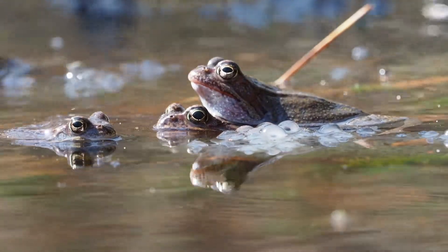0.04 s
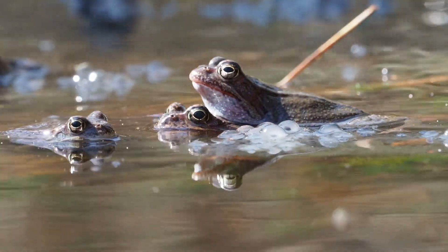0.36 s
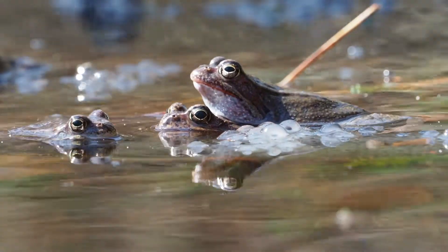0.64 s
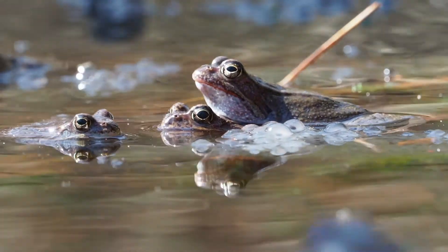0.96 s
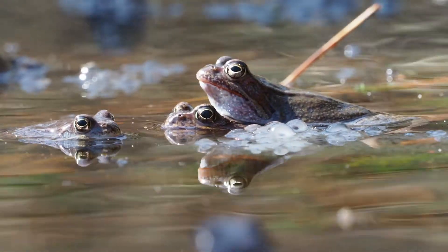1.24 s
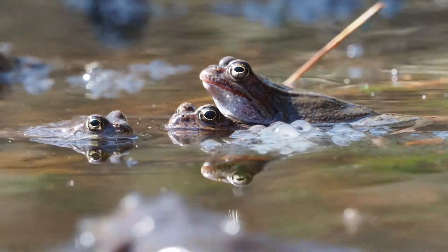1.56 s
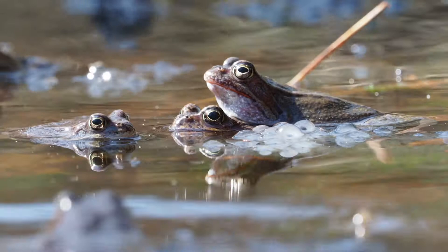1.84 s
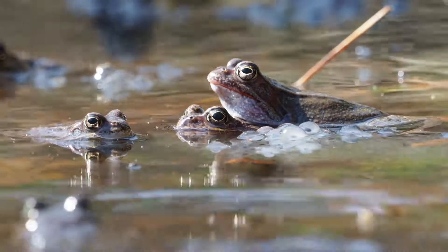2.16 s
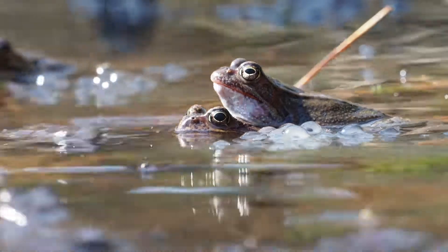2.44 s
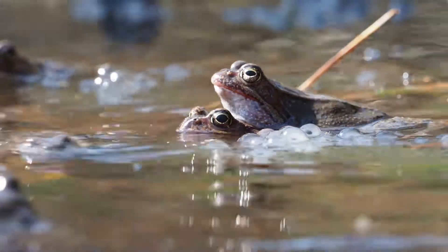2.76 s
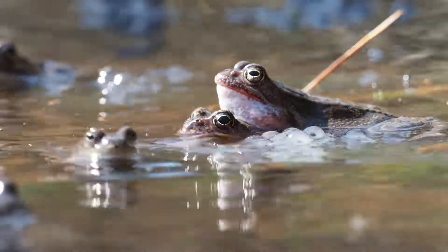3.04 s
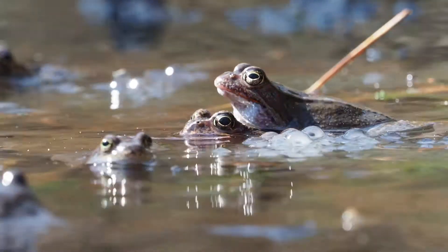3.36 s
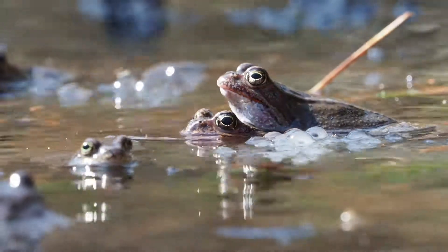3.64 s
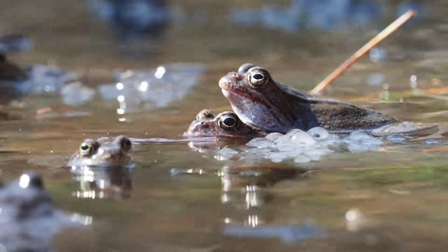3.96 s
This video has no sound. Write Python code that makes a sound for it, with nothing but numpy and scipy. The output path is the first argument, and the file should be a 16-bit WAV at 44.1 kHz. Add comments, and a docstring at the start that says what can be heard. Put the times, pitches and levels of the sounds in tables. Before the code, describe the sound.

A low purring frog chorus with short knocking croaks and light drips of water.

```python
"""A chorus of frogs purrs in a spawning pond: low trains of throat pulses, single knocks from the nearest.
Frogs shifting in the shallows free small chirping bubbles, tick the water and raise a short fizz.
Thin bird whistles and a trill echo from the trees. Underneath lie a far rumble, a faint machine hum,
a soft hiss and a light breeze on the left."""
import sys
import numpy as np
from scipy import signal
from scipy.fft import rfft, irfft, next_fast_len
from scipy.io import wavfile
from scipy.ndimage import map_coordinates

SR = 44100
rng = np.random.default_rng(int(sys.argv[2]) if len(sys.argv) > 2 else 0)


def store_pcm(level_fs):
    """Save levels as 16-bit WAV."""
    pcm = np.round(np.clip(level_fs, -1, 1) * 32767).astype(np.int16)
    wavfile.write(sys.argv[1], SR, np.atleast_2d(pcm).T)


N = 176400
TOP_HZ = 15900

# fader ride of the chorus: t/s, level/dB
CHORUS_SWELL = [(0, -34.5), (.45, -34), (.75, -32.5), (1.4, -33.5), (1.65, -34.5), (1.85, -34), (2.08, -33),
                (2.25, -34), (2.55, -33.5), (2.85, -33), (3.2, -33), (3.55, -34), (4, -35.5)]
# EQ of the croaks: f/Hz, level/dB
CROAK_EQ = [(130, -7.5), (220, -17.5), (308, -11.5), (367, -4), (432, -0.5), (514, -5), (647, -5),
            (864, -13.5), (1020, -10.5), (1270, -16.5), (1780, -29), (2020, -46), (2200, -39), (2860, -68),
            (4840, -120)]
def chorus(count=72, call_s=.55, pulses_per_s=27, throat_hz=496.6):
    """Overlapping purrs, each a swelling train of throat pulses, over the wash of the farthest frogs."""
    pulses = np.zeros((2, N))
    for k, (when, pace, size, pitch) in enumerate(rng.standard_normal((count, 4))):
        start = (k + when / 2) / count * (N / SR + call_s) - call_s
        rate = pulses_per_s * np.exp(.12 * pace)
        throat = ring(throat_hz * np.exp(.25 * pitch), attack=.0011, t60=.015)
        for j, (late, strength) in enumerate(rng.standard_normal((32, 2))):
            age = (j + .0602 * late) / rate
            if 0 < age < call_s:
                swell = np.sin(np.pi * age / call_s) ** .5
                add(pulses[k % 2], start + age, throat * swell * amp(size + .5 * strength))
    purr = amp(-4.5) * spread(pulses, CROAK_EQ)
    wash = amp(-1.5) * spread(rng.standard_normal((2, N)), CROAK_EQ)
    level_db, = curves(CHORUS_SWELL)
    return amp(level_db) * (purr + wash)


# foreground knocks: t/s, level/dB, f/Hz
FROG_KNOCKS = [(.324, -25, 356), (.398, -25, 594), (.651, -23.5, 425), (.728, -24, 435), (.805, -26, 430),
               (.897, -23, 650), (.957, -20.5, 513), (.988, -22, 560), (1.03, -27, 550), (1.067, -25, 390),
               (1.184, -26, 560), (1.227, -26, 400), (1.262, -21.5, 626), (1.335, -20, 397),
               (1.369, -20.5, 520), (1.397, -21, 654), (1.443, -20.5, 603), (1.481, -23.5, 804),
               (1.905, -23, 417), (1.934, -23.5, 432), (1.998, -21.5, 490), (2.058, -26, 480),
               (2.381, -24.5, 474), (2.506, -23.5, 410), (2.633, -20.5, 420), (2.669, -22, 626),
               (2.92, -24.5, 423), (3.121, -20.5, 405), (3.151, -26, 520), (3.21, -20.5, 570),
               (3.263, -23.5, 525), (3.395, -22, 460), (3.629, -25, 367), (3.727, -24.5, 387),
               (3.77, -23.5, 370)]
def near_frogs():
    """Single strong pulses ring two throat resonances for a few cycles."""
    out = np.zeros(N)
    for s, db, hz in FROG_KNOCKS:
        lower = ring(hz, attack=.0011, t60=.016)
        upper = amp(-9) * ring(1.6 * hz, attack=.0011, t60=.012)
        add(out, s, amp(db) * (lower + upper))
    body_eq = [(150, -18), (330, 0), (950, 0), (1900, -18)]
    return placed(equalised(out, body_eq), pan_db=1.6)


def bubble(hz, rise, life):
    """A click and a tone that climbs as the bubble nears the surface, shaken by the moving water."""
    progress = np.minimum(np.arange(SR // 20) / SR / life, 1)
    shape = progress ** .22 * (1 - progress) ** 2.06
    pitch = hz * (1 + rise * progress + .03 * wobble(700)[:len(shape)])
    roughness = amp(2.5 * wobble(700)[:len(shape)])
    chirp = shape / shape.max() * roughness * tone(pitch)
    return chirp + amp(-8.5) * snap(1.19 * hz)


def droplet(hz, spray_db=-15, spray_t60=.029):
    """A tick with a short stereo tail of spray in the same colour."""
    click = snap(hz)
    n = len(click)
    tail = rng.standard_normal((2, n)) * amp(spray_db - 60 * np.arange(n) / SR / spray_t60)
    spray = signal.fftconvolve(tail, click[None] / np.linalg.norm(click), axes=1)[:, :n]
    return click + spray


# rising bubbles: t/s, level/dB, starting f/Hz, rise/share of f, pan left/dB, life/s
RISING_BUBBLES = [(0.875, -41.5, 2037, 0.66, 2, .028), (1.0622, -33.5, 2410, 0.46, 6, 0.013),
                  (1.429, -38, 2900, .066, 4, 0.0089), (1.478, -47, 2340, .05, 2, 0.013),
                  (1.5, -48, 2900, .25, 2, .009), (1.873, -43.5, 3380, .03, 3, 0.0077),
                  (1.899, -43.5, 3980, .03, 1, .005), (1.934, -36.5, 2970, .03, 9, 0.0043),
                  (2.542, -40.5, 2830, .11, 7, 0.0031), (2.589, -46, 4970, .12, 1, 0.0066),
                  (3.1024, -35, 2480, 0.14, 13, 0.0075), (3.112, -42, 2550, .15, 9, .006),
                  (3.127, -45, 2420, .05, 2, .007), (3.256, -41.5, 2660, .08, 7, 0.0043)]
# droplets and bursting films: t/s, level/dB, f/Hz, pan left/dB
DROPLET_TICKS = [(0.123, -39.5, 8100, 5), (0.161, -43, 4940, 4), (.261, -43, 11000, 3),
                 (.291, -39.5, 8150, 3.5), (.569, -39, 8400, 3.5), (.784, -39.5, 10100, 0),
                 (.786, -44, 5000, -1), (1.499, -42, 10500, 6), (1.8925, -43, 9650, 3),
                 (1.907, -40, 9200, 3.5), (1.933, -38.5, 9840, 3), (2.032, -34.5, 4800, 2.5),
                 (2.069, -41, 12300, 2.5), (2.0916, -35, 10100, 9), (2.170, -33.5, 9040, 10),
                 (2.193, -45, 15000, 3.5), (2.220, -36.5, 13100, 4.5), (2.435, -33, 7440, 3),
                 (2.542, -28, 7450, 3), (3.006, -42, 8990, 9), (3.025, -38.5, 9100, 5),
                 (3.1783, -37.5, 2500, 1), (3.21, -47, 3100, 2), (3.2203, -35, 3200, 2.5),
                 (3.2303, -40.5, 3500, 5), (3.24, -41, 3000, 4), (3.2972, -38, 10200, 6),
                 (3.363, -42, 10200, 6), (3.523, -39, 9600, 4), (3.564, -37.5, 7600, 2),
                 (3.62, -38, 9800, 4), (3.6436, -41, 10200, 3.5), (3.663, -39.5, 9200, 2),
                 (3.748, -41, 9250, 4), (3.783, -39, 8300, 3.5), (3.8, -40, 9700, 3.5),
                 (3.86, -40, 9700, 6), (3.974, -35.5, 12600, 8)]
def water():
    """Bubbles chirp in a short wet blur and droplets tick; both share a light reverb."""
    out = np.zeros((2, N))
    for s, db, hz, rise, pan_db, life in RISING_BUBBLES:
        add(out, s, placed(amp(db - 1.5) * bubble(hz, rise, life), pan_db))
    out += amp(-11) * echo(out, t60=.05)
    for s, db, hz, pan_db in DROPLET_TICKS:
        add(out, s, placed(amp(db) * droplet(hz), pan_db))
    return out + amp(-11) * echo(out, t60=.13)


# patches of stirred water: t/s, length/s, level/dB, centre f/Hz
WATER_STIRS = [(.78, 0.12, -66, 7850), (0.981, .3, -73, 9500), (1.885, 0.14, -65, 9840),
               (2.167, .06, -66, 14000), (2.995, 0.053, -66, 10300), (3.079, 0.18, -64, 2660),
               (3.545, 0.4, -75, 10060)]
def stirs(count=900, detune=.135, crackles_per_s=72):
    """Swimming frogs raise a soft, dense fizz of tiny bubbles, with a run of faint crackles."""
    out = np.zeros((2, N))
    for s, length, db, hz in WATER_STIRS:
        fizz = np.zeros((2, N))
        onsets = s + length * rng.beta(1.3, 1.7, count)
        scatter = rng.standard_normal((count, 2))
        sides = rng.integers(2, size=count)
        for onset, (pitch, size), side in zip(onsets, scatter, sides):
            bubble_hz = min(hz * np.exp(detune * pitch), TOP_HZ)
            add(fizz[side], onset, amp(2 * size) * ring(bubble_hz, attack=.00032, t60=.015))
        out += amp(db) * unit(fizz) * np.sqrt(length * SR / N)  # db sets the rms within the patch
        crackles = rng.standard_normal((count, 3))[:int(length * crackles_per_s)]
        for k, (late, pitch, size) in enumerate(crackles):
            crackle = amp(db + 14 + 2 * size) * snap(hz * np.exp(detune * pitch))
            add(out, s + (k + .18 * late) / crackles_per_s, crackle)
    return placed(out, pan_db=3)


# glide of the whistle: t/s, f/Hz, level/dB
WHISTLE_GLIDE = [(.07, 7940, -89), (.11, 7900, -70), (.14, 7600, -67), (.18, 7355, -55), (.235, 7300, -54),
                 (.27, 7130, -67), (.29, 7160, -88)]
def near_bird():
    """One thin, wavering whistle falls in pitch on the left and echoes in the trees."""
    hz, db = curves(WHISTLE_GLIDE)
    whistle = np.sqrt(2) * amp(db + 1.1 * wobble(90)) * tone(hz + 22 * wobble(150))
    return placed(whistle, pan_db=15.5) + echo(whistle, t60=.53)


# distant calls: t/s, length/s, f/Hz, level/dB
FAR_CALLS = [(-.02, 0.054, 4880, -56), (0.047, 0.055, 4900, -61.5), (2.12, 0.33, 2646, -58.5),
             (3.428, 0.1, 2934, -59)]
def far_birds():
    """A few soft-edged notes, blurred by the trees."""
    notes, t = np.zeros(N), np.arange(N) / SR
    for s, length, hz, db in FAR_CALLS:
        swell = np.sin(np.pi * np.clip((t - s) / length, 0, 1))
        notes += amp(db) * np.sqrt(2) * swell * tone(hz + 85 * wobble(220))
    return .55 * notes + 1.05 * echo(notes, t60=.6)


def trill(count=7, start_s=2.497, period_s=.073, note_s=.06, high_hz=4905, low_hz=2610):
    """A bird's quick, rough downward sweeps swell and fade deep in the wood, all reverb."""
    out = np.zeros(N)
    progress = np.minimum(np.arange(SR // 10) / SR / note_s, 1)
    for k in range(count):
        rasp_hz = 440 * wobble(1797)[:len(progress)]
        sweep = tone(high_hz + (low_hz - high_hz) * progress + rasp_hz)
        note = np.sqrt(8 * progress * (1 - progress)) * sweep
        arch_db = -1.5 * (2 * k / (count - 1) - 1) ** 2
        add(out, start_s + k * period_s, amp(-54 + arch_db) * note)
    return placed(echo(out, t60=.38), pan_db=-.5)


# hum tones: f/Hz, starting level/dB, fade/(dB/s)
HUM_TONES = [(122.3, -42.5, 2), (79.05, -45, -0.5)]
def machine_hum():
    """Far machinery: two low tones drifting in level and phase."""
    hum, t = np.zeros(N), np.arange(N) / SR
    for hz, db, fade in HUM_TONES:
        gain = np.sqrt(2) * amp(db - fade * t + 2.9 * wobble(3.45))
        hum += gain * np.sin(2 * np.pi * hz * t + 1.78 * wobble(7))
    return placed(hum, pan_db=2.5)


# fader ride of the breeze: t/s, level/dB
BREEZE_SWELL = [(0, -74), (1.2, -51), (2.4, -46.5), (3.1, -30.5), (4, -38)]
def breeze():
    """A light wind builds to a low buffet and eases, hard left."""
    buffet_eq = [(10, -24), (25, -5.5), (65, -10.5), (130, -29.5), (500, -69)]
    buffet = unit(equalised(rng.standard_normal(N), buffet_eq))
    level_db, = curves(BREEZE_SWELL)
    return np.array([amp(level_db + .5 * wobble(17)) * buffet, np.zeros(N)])


# EQs of the low and high noise beds: f/Hz, level/dB
RUMBLE_EQ = [(11, -43), (18, -6), (32, 6.5), (67, -0.5), (129, -11.5), (150, -8), (216, -10.5),
             (300, -12.5), (390, -6), (660, -120)]
HISS_EQ = [(1060, -66), (1800, -3.5), (1940, 0.5), (2780, 0), (4430, -12.5), (5810, -13), (7230, -12),
           (8360, -16.5), (10000, -11.5), (11400, -21), (13200, -13.5), (15100, -19), (15800, -11)]
def background():
    """A gently wavering far rumble under a faint, even hiss."""
    rumble = amp(-36 + wobble(8)) * spread(rng.standard_normal((2, N)), RUMBLE_EQ)
    hiss = amp(-56.5) * spread(rng.standard_normal((2, N)), HISS_EQ)
    return rumble + hiss


# stereo width: f/Hz, left-right correlation
STEREO_LIKENESS = [(25, .55), (70, .86), (140, .96), (400, .96), (1000, .75), (2000, .2), (5000, .03),
                   (14000, .03)]
# stereo lean: f/Hz, pan left/dB
STEREO_LEAN = [(25, 1.2), (120, 1), (400, .8), (650, 2.3), (1000, 0), (2600, 1.5), (5000, .5), (10000, 2.5)]
def spread(pair, eq):
    """Two unrelated signals as an equalised stereo field of rms 1."""
    def mid_side_gains(hz):
        width = np.arccos(np.clip(along(STEREO_LIKENESS, hz), -1, 1)) / 2
        return amp(along(eq, hz)) * [np.cos(width), np.sin(width)]
    mid, side = filtered(pair, mid_side_gains)
    stereo = np.array([mid + side, mid - side])
    return unit(filtered(stereo, lambda hz: amp(along(STEREO_LEAN, hz) * [[.5], [-.5]])))


def echo(x, t60):
    """Diffuse stereo reverb of the banks and trees, fully wet."""
    t = np.arange(SR) / SR
    tail = rng.standard_normal((2, SR)) * amp(-60 * t / t60)
    return signal.fftconvolve(np.atleast_2d(x), tail / np.linalg.norm(tail[0]), axes=1)[:, :N]


def ring(hz, attack, t60):
    """A damped tone whose envelope peaks at 1; attack and t60 in seconds."""
    t = np.arange(SR // 20) / SR
    shape = (1 - np.exp(-t / attack)) * amp(-60 * t / t60)
    return shape / shape.max() * np.sin(2 * np.pi * hz * t)


def snap(hz, peak_cycles=1.14):
    """A rounded click that peaks after about one cycle."""
    t = np.arange(SR // 20) / SR
    age = t * hz / peak_cycles
    return (age * np.exp(1 - age)) ** 2 * np.sin(2 * np.pi * hz * t)


def tone(hz):
    """A sine following a pitch curve."""
    return np.sin(2 * np.pi * np.cumsum(hz) / SR)


def amp(db):
    """Decibels to gain."""
    return 10 ** (np.asarray(db) / 20)


def unit(x):
    """Scaled to rms 1."""
    return x / np.sqrt(np.mean(x ** 2) + 1e-20)


def along(points, hz):
    """Reads (f/Hz, value) points at hz on a log axis."""
    f, values = np.transpose(points)
    return np.interp(np.log(hz + 1), np.log(f + 1), values)


def curves(rows):
    """One automation curve for each column after the time."""
    s, *cols = np.transpose(rows)
    return [np.interp(np.arange(N) / SR, s, c) for c in cols]


def wobble(rate):
    """A smooth random curve, rate knots a second."""
    return map_coordinates(rng.standard_normal(2048), [np.arange(N) * rate / SR], mode="wrap")


def filtered(x, response):
    """Applies a gain that depends on frequency."""
    size = next_fast_len(N + SR // 2)
    return irfft(rfft(x, size) * response(np.fft.rfftfreq(size, 1 / SR)), size)[..., :N]


def equalised(x, eq):
    """Applies an EQ of (f/Hz, level/dB) points."""
    return filtered(x, lambda hz: amp(along(eq, hz)))


def placed(x, pan_db):
    """Pans a sound left by pan_db."""
    return x * amp([[pan_db / 2], [-pan_db / 2]])


def add(out, s, x):
    """Mixes x into out at time s."""
    i = int(round(s * SR))
    a, b = max(i, 0), min(i + x.shape[-1], N)
    if b > a:
        out[..., a:b] += x[..., a - i:b - i]


def scene():
    """The pond heard from its edge."""
    pond = chorus() + near_frogs() + water() + stirs()
    birds = near_bird() + far_birds() + trill()
    return pond + birds + machine_hum() + breeze() + background()


def record(dry):
    """A brick-wall low-pass on the whole mix."""
    return filtered(dry, lambda hz: hz < TOP_HZ)


dry = scene()
out = record(dry)
store_pcm(out)
```